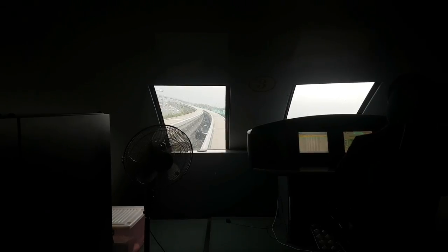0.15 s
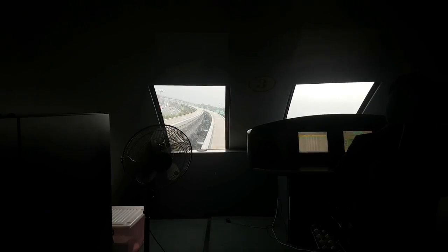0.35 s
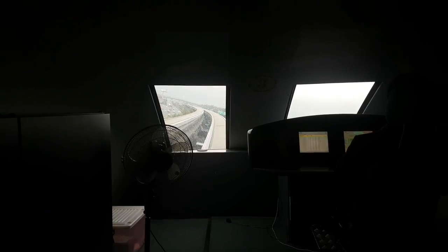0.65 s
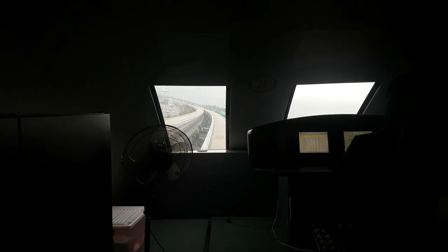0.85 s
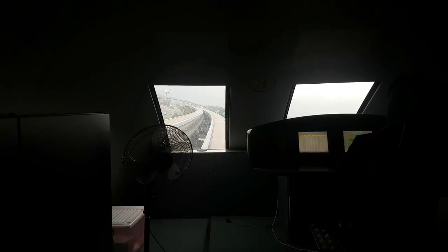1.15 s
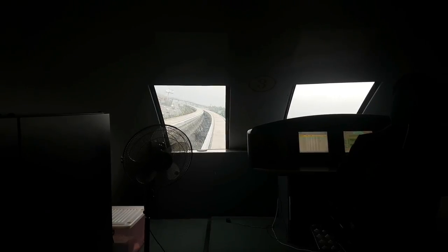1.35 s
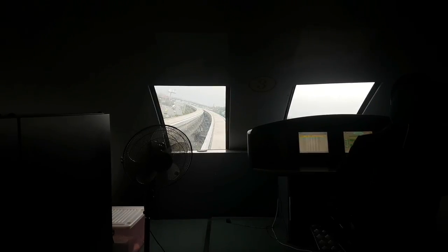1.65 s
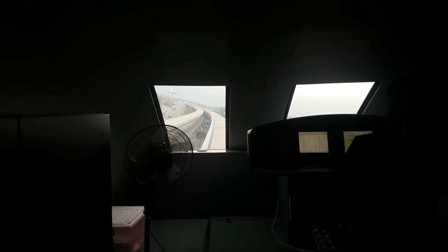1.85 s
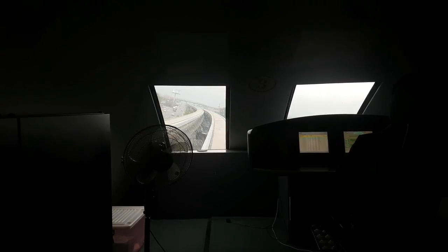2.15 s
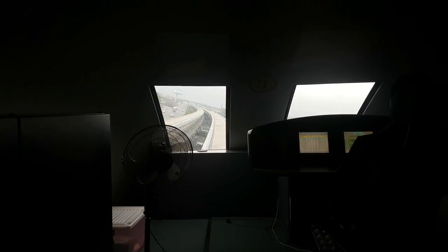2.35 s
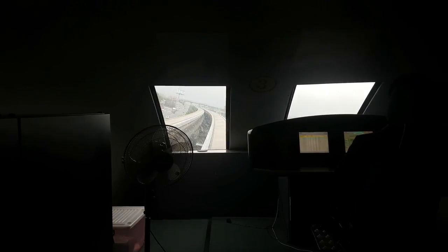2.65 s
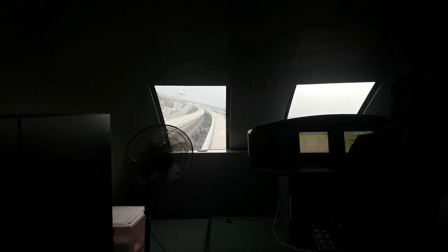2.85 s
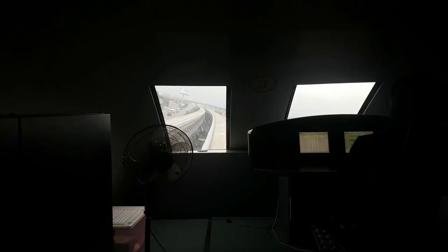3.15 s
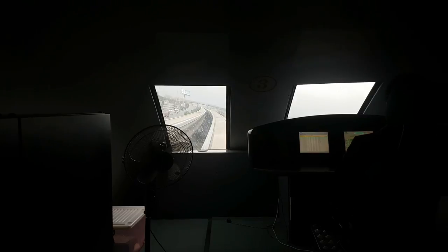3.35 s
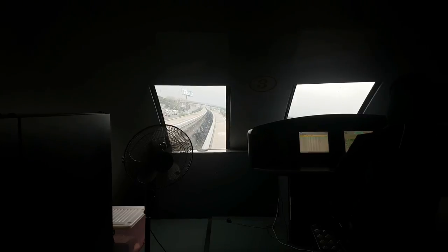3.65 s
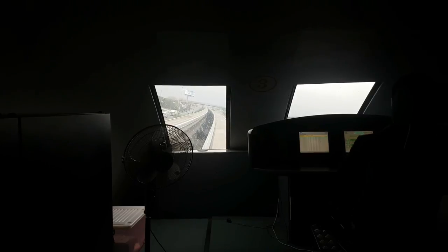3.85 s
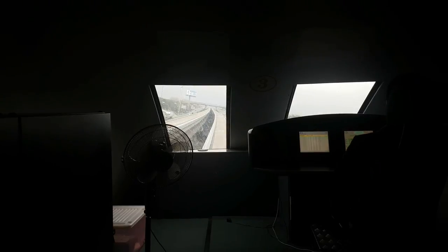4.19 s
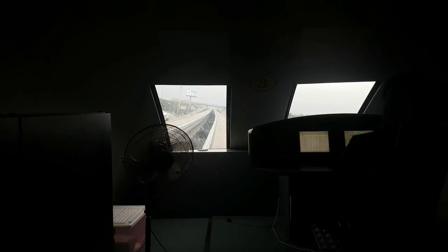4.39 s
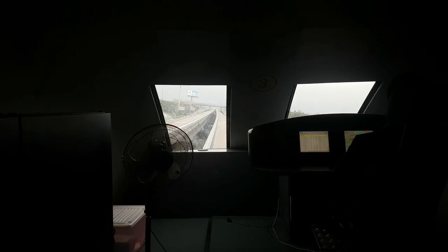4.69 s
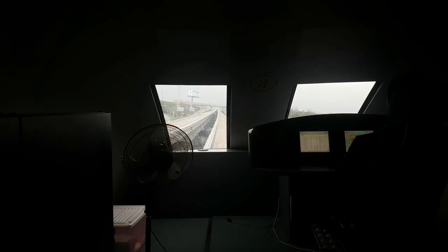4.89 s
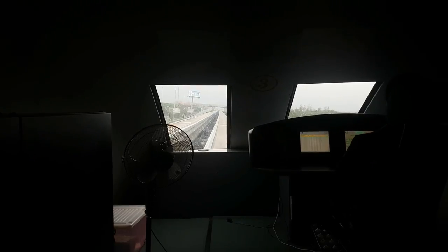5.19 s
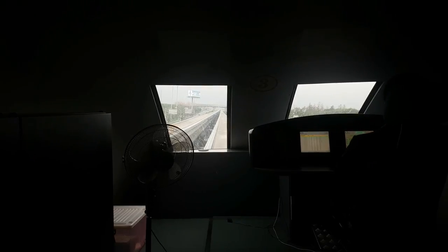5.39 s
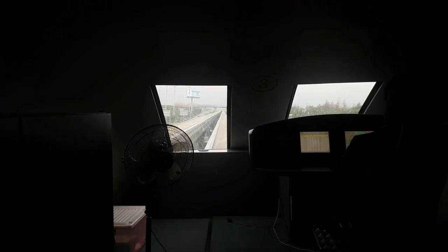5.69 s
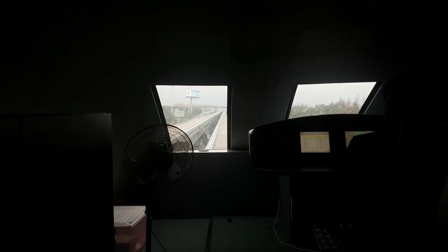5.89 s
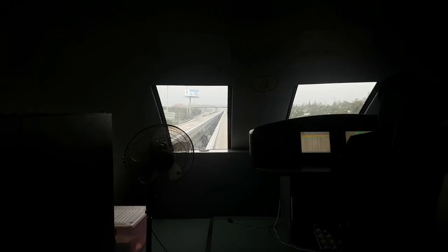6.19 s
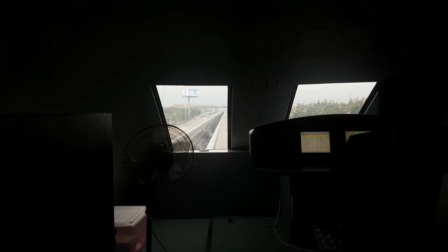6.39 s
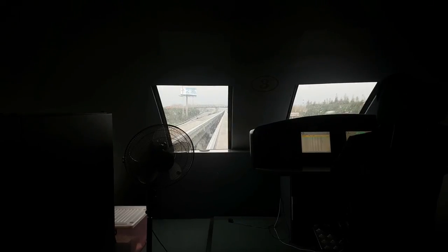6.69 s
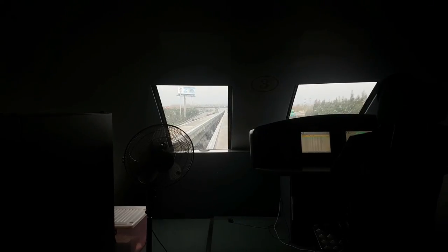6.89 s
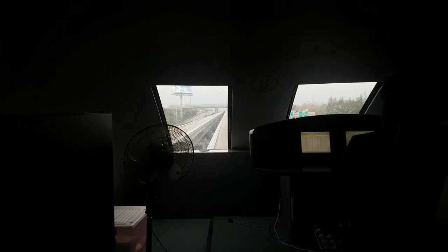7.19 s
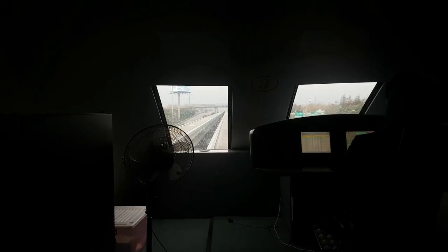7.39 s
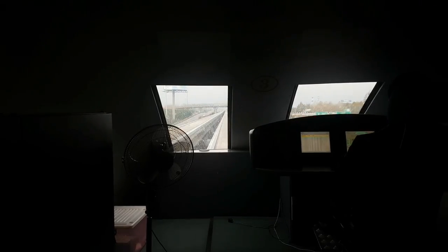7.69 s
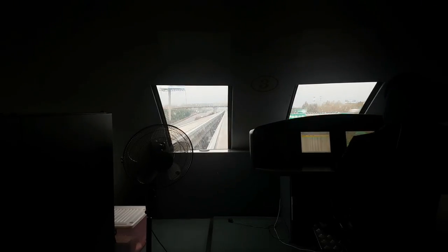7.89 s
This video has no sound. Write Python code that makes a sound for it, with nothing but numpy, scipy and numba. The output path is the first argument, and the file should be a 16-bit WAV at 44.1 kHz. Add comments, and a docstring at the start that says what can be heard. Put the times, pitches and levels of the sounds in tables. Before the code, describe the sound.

Continuous heavy low rumble in a fast train cab, air rushing along the nose, gently gusting and slowly growing as speed builds.

```python
"""Shell rumble leads in the driver's cab of a magnetically levitated train at speed, heard by two spaced microphones.
Guideway and airflow shake the shell and ring the low modes of the cab; panels roar, air rushes along the nose:
each is coloured noise through the cab resonances, swelling with speed and gusts.
The linear motor whines faintly, a wavering sine that climbs with speed, over a fine treble hiss.
A fast limiter holds the loud bass."""
import sys
import numpy as np
from scipy import signal
from scipy.fft import rfft, irfft, next_fast_len
from scipy.io import wavfile
from scipy.ndimage import uniform_filter1d
from numba import njit

SR = 44100
rng = np.random.default_rng(int(sys.argv[2]) if len(sys.argv) > 2 else 0)


def gain_from_db(level_db):
    """Convert decibel levels to linear amplitude factors (20 dB per decade)."""
    decades = np.asarray(level_db, float) / 20
    return 10 ** decades


def generate_wav(sig):
    """Save sig (samples, or channels by samples) to the path in sys.argv[1] as 16-bit PCM at SR."""
    pcm = np.round(np.clip(np.atleast_2d(sig).T, -1, 1) * 32767).astype(np.int16)
    wavfile.write(sys.argv[1], SR, pcm)


N = 354563
T = np.arange(N) / SR  # s
SIZE = next_fast_len(N)  # FFT length, samples
HZ = np.maximum(np.arange(SIZE // 2 + 1) * SR / SIZE, 1)  # FFT bins, kept off 0 for the logarithm


def shell_rumble(shake_db):
    """Guideway and airflow shake the shell: low noise, rising as the train gains speed."""
    # shell colour: f/Hz, level/dB
    shell_colour = [(15, -31.5), (32, -19), (47, -21), (62, -14.5), (76, -13), (88, -3.5), (130, -7.5),
                    (200, -7), (315, -14.5), (330, -20.5), (420, -44), (900, -110)]
    start_db, rise_db_per_s = -15.5, 0.1147
    level_db = start_db + rise_db_per_s * T + shake_db + 0.23 * walk(2.5)
    return gain_from_db(level_db) * field(shell_colour)


def panel_roar(gust_db, shake_db, buffet):
    """Panels roar in the middle range, driven partly by the air on the nose and partly by the shell."""
    # panel colour: f/Hz, level/dB
    panel_colour = [(120, -71), (250, -22.5), (330, -2), (450, 1.5), (560, 0), (700, -2.5), (950, -8),
                    (1200, -8), (1500, -47.5), (2500, -100)]
    start_db, rise_db_per_s = -23.5, 0.11
    rush_share = 0.71  # the shell drives the rest
    drive_db = rush_share * gust_db + (1 - rush_share) * shake_db
    level_db = start_db + rise_db_per_s * T + drive_db + 0.5 * buffet + 0.21 * walk(17)
    return gain_from_db(level_db) * field(panel_colour)


def air_rush(flow_db, buffet):
    """Air rushes along the nose: broad noise that follows speed, gusts and buffeting."""
    # rush colour: f/Hz, level/dB
    rush_colour = [(500, -66.5), (1000, -20), (1300, 1.5), (1900, -1), (2500, -5), (2750, -6), (3700, -8),
                   (4150, -12.5), (5050, -16.5), (5600, -23), (6100, -23), (6400, -25), (8000, -31.5),
                   (9300, -51.5), (11000, -76.5)]
    level_db = -29.5 + flow_db + 0.52 * buffet + 0.42 * walk(22)
    return gain_from_db(level_db) * field(rush_colour)


def motor_whine():
    """Slots of the guideway winding pass at a rate set by speed; the tone wavers a little in pitch and level."""
    # whine coming forward out of the rush: middle/s, length/s, swell/dB, extra lag of left/rad
    whine_swells = [(.5, 1.7, 10, .4), (1.7, .7, 5, 0), (4.6, .8, 9, -.7), (5.5, .7, 7, 0), (6.2, .5, 7, 0),
                    (6.9, .6, 5, 0), (7.65, .8, 10, 2)]
    start_hz, rise_hz_per_s, wander_hz = 1000, 4.2, 3.5
    base_db, base_lag_rad = -49.5, 0.9
    swell_db, more_lag_rad = swells(whine_swells)
    f_hz = start_hz + rise_hz_per_s * T + wander_hz * walk(25)
    phase_rad = 2 * np.pi * np.cumsum(f_hz) / SR
    lag_rad = base_lag_rad + more_lag_rad + 0.4 * walk(8)
    rms = gain_from_db(base_db + swell_db + 2.5 * walk(14))
    left = 0.8 * np.sin(phase_rad - lag_rad)
    right = 1.2 * np.sin(phase_rad)
    return np.sqrt(2) * rms * np.array([left, right])


def fine_hiss(flow_db, buffet):
    """The finest hiss rises with the air rush, less steeply, with faint rustles."""
    # hiss colour: f/Hz, level/dB
    hiss_colour = [(6000, -50), (8000, -20), (9500, -3), (12000, -1), (14300, -1), (14850, 3), (15700, -3),
                   (15800, -60)]
    # rustles in the highest treble: middle/s, length/s, swell/dB
    rustles = [(3.85, .35, 2.5), (6.78, .04, 4.5), (7.65, .3, 3)]
    level_db = -67 + 0.6 * flow_db + swells(rustles) + 0.6 * buffet + 0.6 * walk(25)
    return gain_from_db(level_db) * field(hiss_colour)


def field(colour):
    """Coloured noise ringing in the cab, partly shared by two spaced microphones; rms 1 over the pair."""
    # resonances of cab and panels: f/Hz, width at half the lift/Hz, lift/dB
    cab_modes = [(33, 10, 7), (63, 12, 5), (108, 18, 6), (147, 14, 10.5), (172, 14, 4), (196, 14, 6),
                 (228, 12, 10), (250, 10, 2.5), (272, 16, 5.5), (299, 14, 6), (316, 10, 4), (354, 26, 9),
                 (395, 12, 6), (434, 14, 8), (456, 16, 3.5), (503, 16, 4), (540, 24, 2), (605, 20, 2),
                 (1070, 70, 2), (1615, 45, 1.5), (1775, 40, 2.5), (2490, 140, 2.5), (2970, 50, 2),
                 (3690, 60, 1.5)]
    # likeness between the microphones: f/Hz, likeness/0-1
    likeness = [(20, .98), (130, .995), (240, .98), (340, .88), (410, .4), (500, .58), (720, .08),
                (1000, .3), (1400, .68), (2000, .2), (2500, .45), (4000, .22), (8800, .3), (12000, .15),
                (14900, .45)]
    # phase by which left leads: f/Hz, lead/rad
    left_lead = [(0, 0), (70, -.3), (400, -.1), (750, -.1), (1050, -2.7), (1500, -3.3), (2450, -5.9),
                 (2850, -8.8), (3700, -12.4), (4250, -14.8), (5700, -18.5), (8300, -24.8), (16000, -31.6)]
    # level of left minus right: f/Hz, difference/dB
    left_lean = [(60, 1.5), (110, -1.0), (200, -1.0), (380, 1.5), (700, -4), (1290, -3.5), (2380, -3.0),
                 (4000, -5), (5000, -7), (6000, -3), (8120, -3.5), (10300, 3), (13000, 2.5), (15000, 0.5)]
    ring_db = sum(db / (1 + (2 * (HZ - hz) / width) ** 2) for hz, width, db in cab_modes)
    shared, other = rfft(rng.standard_normal((2, SIZE)))
    alike = np.clip(on_hz(likeness), 0, 1)
    lead = np.exp(1j * np.interp(HZ, *np.transpose(left_lead)))
    left = alike * lead * shared + np.sqrt(1 - alike ** 2) * other
    half_lean_db = on_hz(left_lean) / 2
    pair = np.array([left * gain_from_db(half_lean_db), shared * gain_from_db(-half_lean_db)])
    noise = irfft(pair * gain_from_db(on_hz(colour) + ring_db), SIZE)[:, :N]
    return noise / np.sqrt(np.mean(noise ** 2))


def on_hz(table):
    """A table of f/Hz and value, read on a log-frequency axis."""
    hz, value = np.transpose(table)
    return np.interp(np.log(HZ), np.log(hz), value)


def swells(rows):
    """Bell-shaped swells summed per column after the length, which is the width at about a third of the height."""
    return sum(np.outer(peaks, np.exp(-(2 * (T - middle_s) / length_s) ** 2))
               for middle_s, length_s, *peaks in rows)


def walk(rate_hz):
    """Random levels held 1 / rate_hz and slewed twice; spread near 1."""
    hold = int(SR / rate_hz)
    steps = np.repeat(rng.standard_normal(N // hold + 1), hold)
    slewed = uniform_filter1d(uniform_filter1d(steps, hold), hold)
    return 1.3 * slewed[:N]


def scene():
    """Rumble, roar and rush share the gusts, roar, rush and hiss the buffeting; each also flickers alone."""
    # gusts and one lull on the nose: middle/s, length/s, swell of rush/dB, swell of shell/dB
    gusts = [(.6, 0.65, 1, 0.5), (1.75, .7, 2, 1.5), (3.35, 0.4, 1, 3), (4.65, 0.48, 2, 2),
             (5.3, 0.4, -1, -2.5), (6.5, 1, 1.34, 1.5), (7.65, 0.39, 2.5, 2.5)]
    gust_db, shake_db = swells(gusts)
    flow_db = 0.2648 * T + gust_db  # rises in dB/s as the train gains speed evenly
    buffet = walk(11)
    rumble = shell_rumble(shake_db)
    roar = panel_roar(gust_db, shake_db, buffet)
    rush = air_rush(flow_db, buffet)
    return rumble + roar + rush + motor_whine() + fine_hiss(flow_db, buffet)


@njit
def limit(x, top, ratio, attack, release):
    """One gain for both channels, pulled down fast by the louder one and smoothed once more."""
    y, envelope, gain = np.empty_like(x), top, 1.
    for i in range(x.shape[1]):
        peak = max(abs(x[0, i]), abs(x[1, i]))
        envelope += (peak - envelope) * (attack if peak > envelope else release)
        target = min(1., (top / envelope) ** (1 - 1 / ratio))
        gain += (target - gain) * attack
        y[0, i], y[1, i] = x[0, i] * gain, x[1, i] * gain
    return y


def roll_off(x):
    """The treble ends steeply here."""
    return signal.sosfilt(signal.butter(12, 15820, fs=SR, output="sos"), x)


def record(dry):
    """Fast limiter on the bass peaks, then a converter that rounds off what slips through."""
    attack_s, release_s = 0.00028, 0.013
    held = limit(gain_from_db(4.0) * dry, 0.52, 2.0, 1 / (attack_s * SR), 1 / (release_s * SR))
    rounded = held / (1 + held ** 10) ** (1 / 10)
    return roll_off(rounded)


dry = scene()
out = record(dry)
generate_wav(out)
```